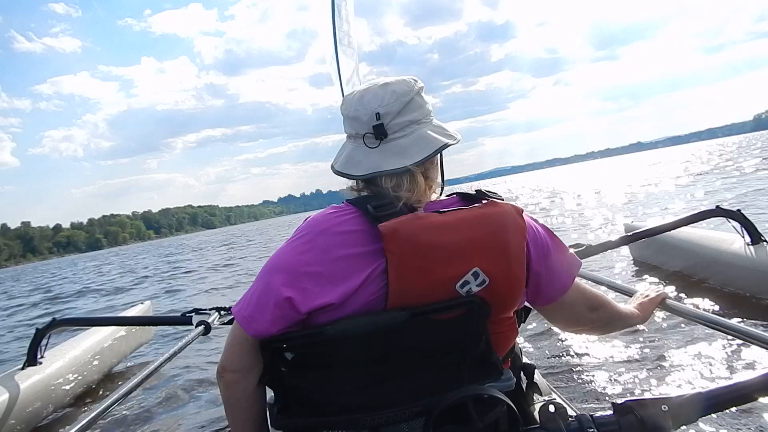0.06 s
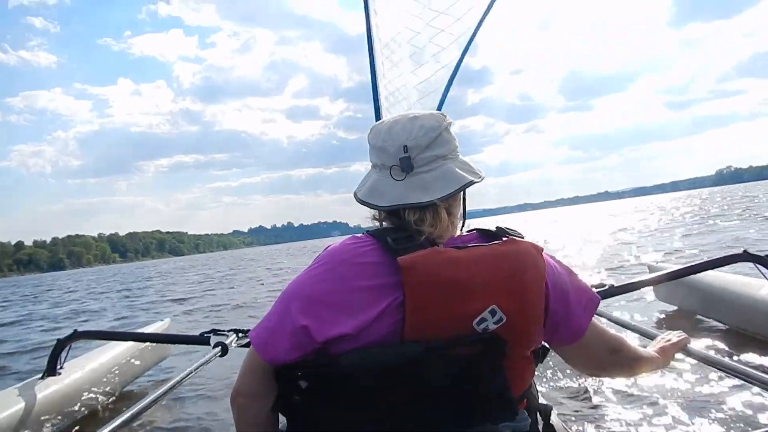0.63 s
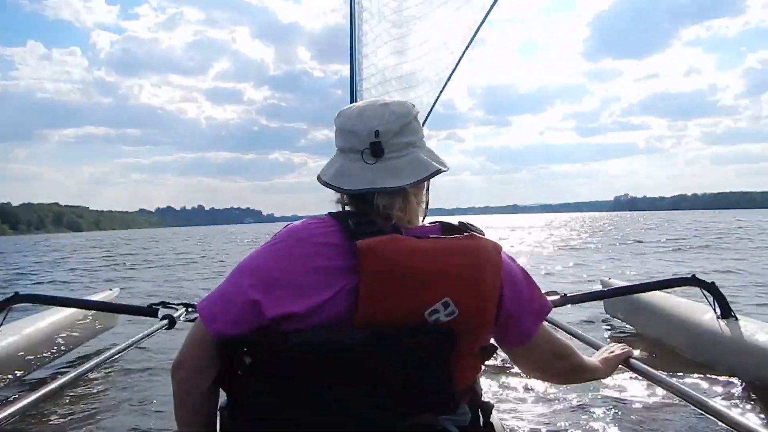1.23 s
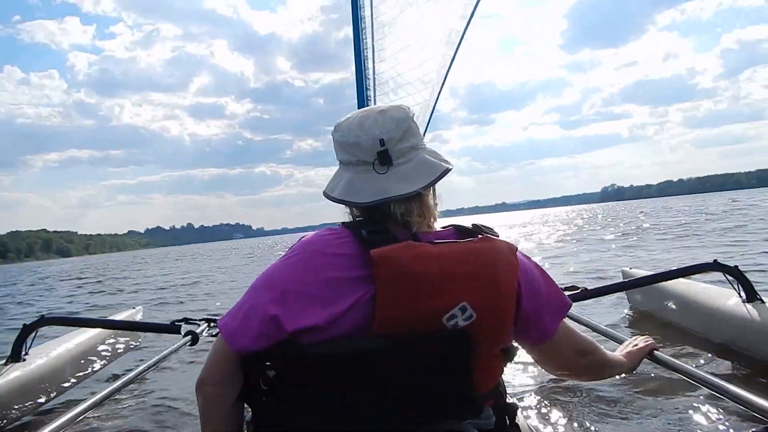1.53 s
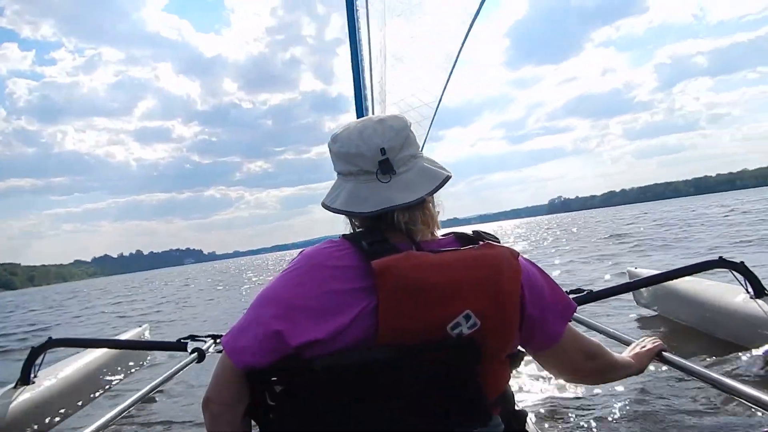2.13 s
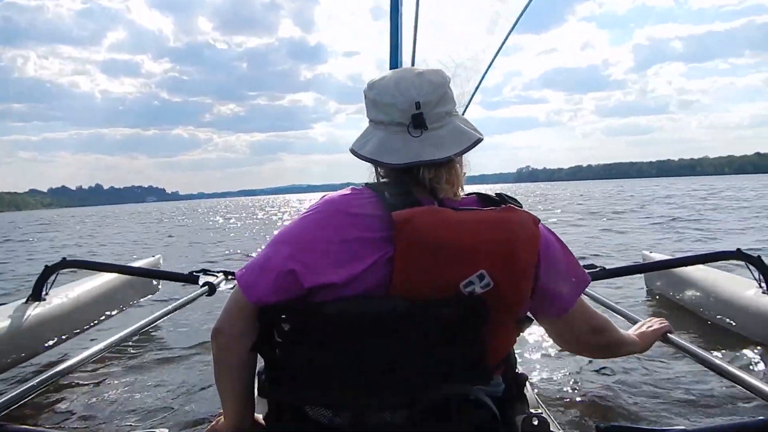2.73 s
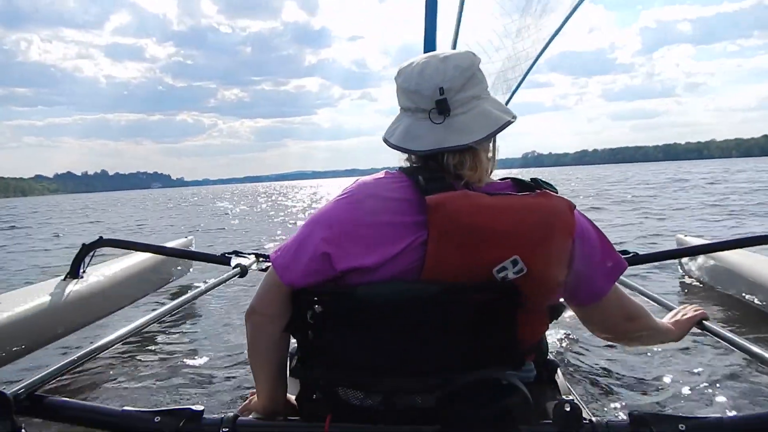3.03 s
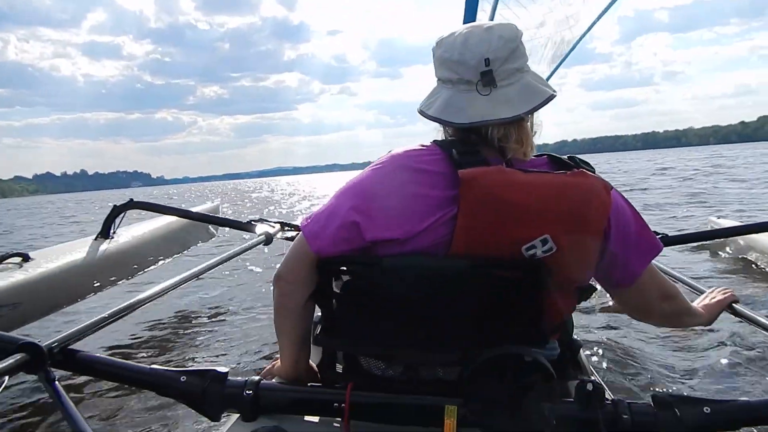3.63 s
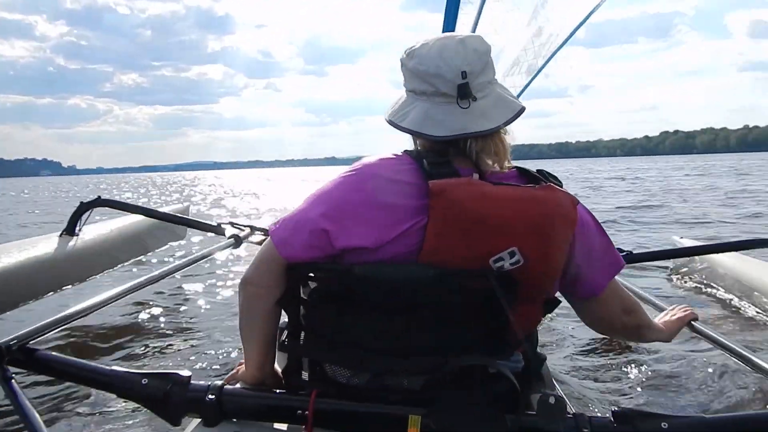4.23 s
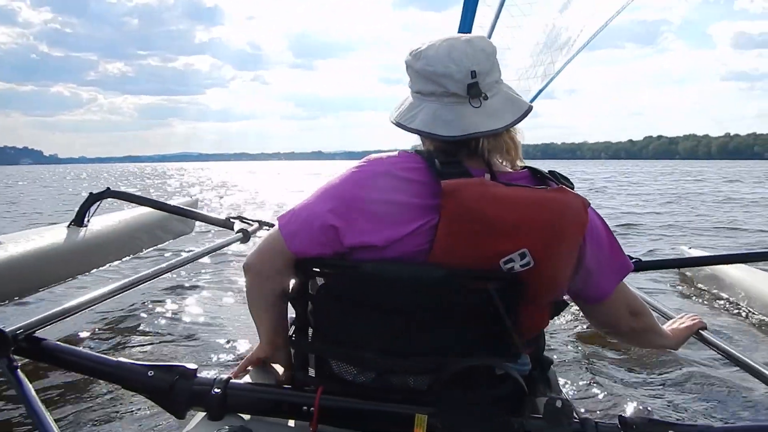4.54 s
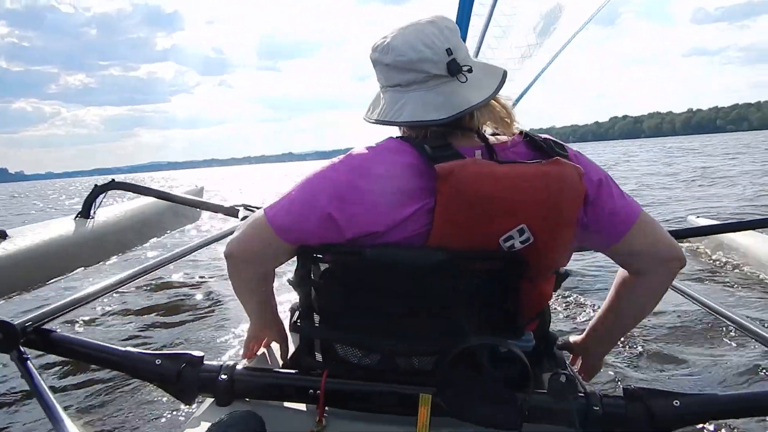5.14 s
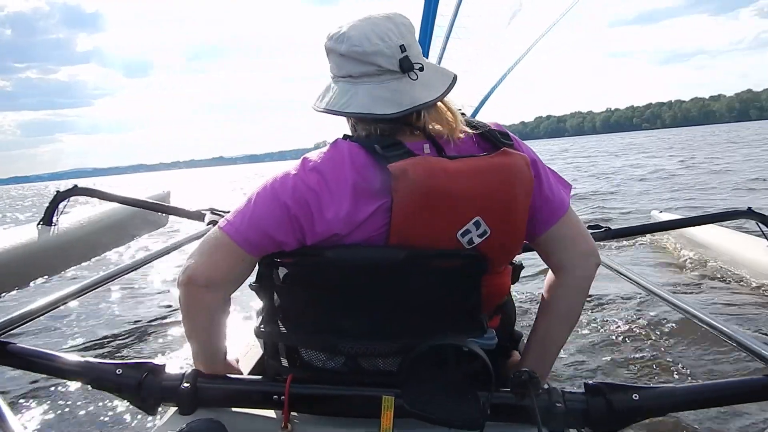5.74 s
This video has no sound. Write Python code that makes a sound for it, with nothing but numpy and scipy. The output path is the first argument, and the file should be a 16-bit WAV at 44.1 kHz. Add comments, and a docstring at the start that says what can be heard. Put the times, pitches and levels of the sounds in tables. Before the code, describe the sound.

Water washes and bubbles against a small sailing boat as hissing, buffeting gusts die down, with a few clicks and dull hull knocks.

```python
"""Gusts of wind rush, hiss and pop, then drop away to leave water lapping and bubbling.
A small outrigger sailing boat is running over a choppy river, with a camera fixed behind the seat.
The air rushes over the camera, and its swirls thump on the two microphone openings (ports).
Water washes along the hulls, fittings click and the hull gives a few dull knocks."""
import sys
import numpy as np
from scipy.fft import rfft, irfft, next_fast_len
from scipy.io import wavfile
from scipy.ndimage import map_coordinates

SR = 44100
rng = np.random.default_rng(int(sys.argv[2]) if len(sys.argv) > 2 else 0)


def inscribe(sig):
    """Save sig as 16-bit PCM at rate SR to the path in sys.argv[1].

    A 1-D sig is mono; a 2-D sig holds one channel per row.
    Samples are clipped to [-1, 1] before scaling.
    """
    pcm = np.round(np.clip(np.atleast_2d(sig).T, -1, 1) * 32767)
    wavfile.write(sys.argv[1], SR, pcm.astype(np.int16))


N = 259308
TIME = np.arange(N) / SR


def wind():
    """Air rushes over the camera; strong gusts tear into a sputtering hiss and throw fine spray."""
    # strength of the wind (time [s], relative level [dB])
    strength = [(0, -22), (.55, -18.5), (.87, -19), (.93, -28.5), (1.06, -18.5), (1.3, -21.5),
                (1.53, -30.5), (1.78, -32.5), (1.9, -59), (2.12, -36), (2.26, -37.5), (2.42, -26.5),
                (2.57, -40), (2.92, -27), (3.28, -34), (3.4, -39), (3.6, -37), (3.8, -60)]
    # gusts on top of it (time [s], relative peak [dB], rise time [s], hiss share [dB])
    gusts = [(.29, -20.5, 0.021, -10.5), (.42, -26.5, 0.026, -3.5), (0.607, -14.5, 0.0073, -8.5),
             (.68, -28, 0.0058, -4), (0.828, -17.5, 0.017, -16), (1.06, -23, 0.02, -9.5),
             (1.17, -23.5, 0.028, -4), (1.329, -19.5, 0.0067, -9), (1.425, -21.5, 0.013, -17.5),
             (2.089, -31, 0.0027, -12), (2.373, -18.5, 0.021, -21), (2.662, -22.5, 0.012, -19),
             (2.85, -28.5, 0.029, -22), (3.046, -38.5, 0.017, 5.5), (3.13, -31.5, .02, -8),
             (3.256, -20, 0.032, -10), (3.311, -17.5, 0.007, -5), (3.498, -25, 0.017, -8.5),
             (3.623, -38, 0.0083, -6)]
    # tone of the rush, its dull part, the hiss and the finest spray (frequency [Hz], level [dB])
    rush_tone = [(60, -21), (200, -7.5), (500, -6), (750, -1), (1150, 1), (1480, -1.5), (1750, 1.5),
                 (2300, -6), (2800, -13), (4000, -22), (7000, -54), (16000, -46)]
    murmur_tone = [(150, -9.5), (300, -3.5), (500, -3), (750, 1.5), (1100, -7.5), (1800, -16.5),
                   (4000, -77)]
    hiss_tone = [(800, -6), (2000, 6), (3000, 4), (3800, 7), (5300, 6.5), (6400, 1), (7300, -8),
                 (16000, -12.5)]
    mist_tone = [(4000, -25), (7500, -11), (10000, 1), (16000, -4)]
    strong_wind_db, strong_hiss_db = -19, -33.5
    wind_db = over_time(strength)
    hiss_db = strong_hiss_db + 1.22 * (wind_db - strong_wind_db)
    lull_db = np.interp(TIME, [3.6, 4.04], [0, -25])  # the wind drops away
    swirl = wobble(70)
    rush = amp(wind_db + lull_db + 0.89 * swirl - 1.32)
    rush = rush * coloured(noise() * amp(1.66 * wobble(500)), rush_tone)
    # the dull part changes less than the rush, so weak wind sounds darker
    murmur = amp(0.36 * wind_db + lull_db - 20) * coloured(noise(), murmur_tone)
    sputter = amp(2.4 * swirl + 1.84 * wobble(300))
    droplets = bubbles(per_second=1200, hz=4575, spread=0.312, cycles=11, scatter_db=6.5)
    fizz = amp(5) * coloured(noise() * sputter, hiss_tone) + amp(-5.5) * droplets
    gust_gain = sum(amp(db) * swell(s, rise) for s, db, rise, _ in gusts)
    gust_spray = sum(amp(db + share_db) * swell(s, rise) for s, db, rise, share_db in gusts)
    spray_gain = np.hypot(amp(hiss_db + lull_db), gust_spray)
    flung_drops = bubbles(per_second=900, hz=5520, spread=0.15, cycles=19, scatter_db=4)
    spurts = amp(2 * wobble(28) - 2)
    hiss = spray_gain * spurts * fizz + amp(-9) * gust_spray * flung_drops
    mist_gain = amp(-50.5) * (spray_gain / amp(strong_hiss_db)) ** 0.89
    mist = mist_gain * coloured(noise() * sputter, mist_tone)
    gust_rush = gust_gain * coloured(noise(), rush_tone)
    return ports(rush + murmur + hiss + mist + gust_rush, wider_db=-2)


def buffeting():
    """Swirls of air push on each port in lumps, making a low rumble and a flutter."""
    # strength of the swirling (time [s], relative level [dB])
    strength = [(0, -32.5), (.6, -31), (.76, -24.5), (1.18, -31.5), (1.6, -33), (2.25, -37), (2.5, -32.5),
                (3.1, -34), (3.45, -37.5), (3.77, -34), (3.95, -41), (4.33, -33), (4.45, -39.5),
                (4.68, -32), (4.9, -34.5), (5.25, -33), (5.88, -31.5)]
    # tone of the rumble and of the flutter (frequency [Hz], level [dB])
    rumble_tone = [(10, -7.5), (25, 2), (45, 1), (110, -0.5), (160, -9.5), (300, -25), (700, -60),
                   (2000, -94)]
    flutter_tone = [(60, -16), (130, 3), (280, -1.5), (400, -7.5), (600, -19.5), (1500, -27), (5000, -64)]
    lumps = amp(2.7 * np.array([wobble(25), wobble(23)]))
    rumble = amp(3) * stereo(coloured(noise() * lumps, rumble_tone), side_db=-2)
    flutter = amp(-0.5) * stereo(coloured(noise() * lumps, flutter_tone), side_db=-12.5)
    return amp(over_time(strength)) * (rumble + flutter) * amp([[0.4], [-0.4]][::-1])


def pops():
    """A strong swirl swings the air pressure at one port for a cycle or two; the other feels less."""
    # single swirls (time [s], level [dB], pitch [Hz], left minus right [dB])
    swirls = [(0.215, -8, 147, 8), (0.271, -4, 240, 15), (0.291, -4.5, 104, -6), (0.312, -8, 177, -9),
              (0.486, -12, 100, -3), (.667, -8, 236, -10), (0.715, -10.5, 170, -4), (0.752, -10.5, 196, 4),
              (.868, -9, 180, 17), (0.902, -3, 156, -8), (1.001, -10, 140, -1), (1.045, -9.5, 178, -19),
              (1.282, -9.5, 218, -4), (1.567, -12.5, 132, -19), (1.834, -14.5, 52, 1),
              (1.948, -15.5, 139, -3.5), (2.089, -17, 150, -16), (2.496, -13, 180, 15),
              (2.715, -15.5, 136, -18), (3.072, -18, 146, 3), (3.742, -13, 105, 1),
              (4.277, -17.5, 140, -2.5), (4.324, -16.5, 130, -4), (4.689, -14.5, 158, -12),
              (5.038, -8.5, 144, -6), (5.192, -14.5, 114, -12), (5.375, -16, 136, 21),
              (5.832, -1.5, 196, -17)]
    push_cycles = 0.51  # how long a pop pushes, in cycles of its own pitch
    out, t = np.zeros((2, N)), np.arange(-SR // 20, SR // 20) / SR
    for s, db, hz, lean_db in swirls:
        phase = 2 * np.pi * hz * t + rng.uniform(0, 2 * np.pi) + [[0], [1.4]]
        push = 1 / np.cosh(np.clip(t * hz / push_cycles, -20, 20))
        # the swing steepens at its height, which adds overtones
        swing = np.sin(phase) + push * (amp(-10) * np.sin(2 * phase) + amp(-15.5) * np.sin(3 * phase))
        port_gains = amp(db + np.minimum([[lean_db], [-lean_db]], 0))
        add(out, s + t[0], port_gains * swing * push)
    return out


def water():
    """Water washes along the hulls, full of bubbles and tiny splashes, with fine spray above it."""
    # strength of the flow (time [s], relative level [dB])
    flow = [(3.7, -40.5), (3.78, -51.5), (4.1, -44.5), (4.42, -47.5), (4.73, -39), (4.92, -42),
            (5.1, -39.5), (5.48, -44), (5.7, -39.5), (5.88, -40.5)]
    # single bubbles and drops (time [s], relative level [dB], pitch [Hz], life [s], pitch rise [share])
    drops = [(3.996, -34.5, 1464, 0.045, 0.23), (4.0, -34, 2280, .015, 0.11), (4.159, -25, 356, 0.019, .05),
             (4.39, -35, 1285, 0.044, 0.26), (4.423, -29, 2540, 0.017, 0.05),
             (4.636, -22.5, 3740, 0.0059, .05), (5.124, -29, 5300, .013, 0.024),
             (5.737, -27.5, 2030, 0.015, .1)]
    # small waves slapping the hulls (time [s], relative level [dB])
    slaps = [(2.297, -16), (3.831, -35.5), (4.265, -29), (4.314, -27.5), (4.612, -23.5), (4.651, -25),
             (4.761, -24.5), (5.004, -24.5), (5.119, -25), (5.559, -21), (5.594, -28), (5.615, -26),
             (5.653, -21), (5.801, -25.5)]
    # tone of the wash and of the spray (frequency [Hz], level [dB])
    wash_tone = [(150, -10), (500, 1), (750, 6), (1200, 2), (2100, 1), (2800, -24), (5000, -25),
                 (16000, -56)]
    spray_tone = [(1000, -16), (2500, 4.5), (3800, 4.5), (5500, 5.5), (7000, -4), (16000, -9)]
    wash_db = over_time(flow)
    build_up_db = np.interp(TIME, [3.27, 4.3], [-8.5, 0])
    spray_db = -51 + 0.36 * (wash_db - wash_db.mean()) + build_up_db
    lapping = amp(1.16 * wobble(30) + 2.1 * wobble(200))
    gurgle = bubbles(per_second=260, hz=1315, spread=0.625, cycles=5.4, scatter_db=3.5)
    fizz = bubbles(per_second=480, hz=4910, spread=0.32, cycles=12.5, scatter_db=6.5)
    wash = amp(-1) * coloured(noise() * lapping, wash_tone) + amp(-3) * gurgle
    spray = amp(2.5) * coloured(noise() * lapping, spray_tone) + fizz
    out = amp(wash_db) * wash + amp(spray_db) * spray
    t = np.arange(SR // 10) / SR
    for s, db, hz, life, rise in drops:
        churn = 1 + 0.49 * wobble(430)[:len(t)]  # the churning surface breaks up each ring
        add(out[0], s, amp(db + 1.5) * bubble(t, hz, life, rise) * churn)
    for s, db in slaps:
        burst = noise(len(t)) * (1 - np.exp(-t / 0.00043)) * amp(-60 * t / 0.061)
        splash = coloured(burst, wash_tone) + amp(-11) * coloured(burst, spray_tone)
        add(out, s, amp(db - 19) * splash)
    return ports(out, wider_db=-0.5)


def fittings():
    """Each click is one sharp snap followed by a brief, duller rattle through the frame."""
    # clicks (time [s], relative level [dB], brightness [dB], stereo width [dB], rattle [dB])
    clicks = [(1.782, -9, -5.5, -5, -4), (2.6284, -14, 2, 6, -13), (4.2253, -19.5, -7, -3, 0),
              (4.291, -24, -4.5, -2, 2), (4.4913, -16.5, -8, -4, 5), (4.6054, -20, -3, -2, 8),
              (4.7463, -19.5, -1, -7, -6), (4.995, -18.5, -7.5, -6, -2)]
    # tone of the whole click and of its rattle (frequency [Hz], gain [dB])
    click_tone = [(200, -6), (700, 14), (2100, 13), (3600, -0.5), (5500, -3), (8000, -7.5), (16000, -1.5)]
    rattle_tone = [(2000, 2), (6000, 8.5), (9000, -8), (16000, -13)]
    out, t = np.zeros((2, N)), np.arange(SR // 20) / SR
    lead = len(t) // 8  # silent samples that give the filter room before the snap
    fade = (1 - np.exp(-t / 0.00034)) * (amp(-60 * t / 0.011) + 0.085 * amp(-60 * t / 0.1))
    treble_share = [(2000, 0.03), (4500, 1.0)]  # (frequency [Hz], part of the brightness [share])
    for s, db, bright_db, wider_db, rattle_db in clicks:
        rattle = filtered(noise(len(t)) * fade, lambda hz: amp(along(rattle_tone, hz)))
        hit = amp(rattle_db - 5) * rattle
        hit[:, 0] += [1.4, 0.8]  # the snap
        tone = lambda hz: amp(along(click_tone, hz) + (bright_db + 9) * along(treble_share, hz))
        click = unit(filtered(np.pad(hit, ((0, 0), (lead, 0))), tone))
        add(out, s - lead / SR, amp(db - 18) * ports(click, wider_db))
    return out


def hull():
    """Soft blows swell and die within a few cycles of the hollow hull's note."""
    # dull knocks (time [s], relative level [dB], pitch [Hz])
    knocks = [(3.185, -16.5, 233), (3.312, -11, 278), (4.656, -23, 277), (4.747, -16.5, 190),
              (4.997, -23, 270)]
    out, t = np.zeros(N), np.arange(SR // 8) / SR
    age = t / 0.0058  # reaches 1 at the loudest moment
    for s, db, hz in knocks:
        ring = np.sin(2 * np.pi * hz * t) + amp(-5) * np.sin(2 * np.pi * 1.47 * hz * t)
        add(out, s, amp(db - 1.5) * ring * (age * np.exp(1 - age)) ** 2)
    return out


def bubble(t, hz, life, rise):
    """A fading ring whose pitch climbs as the bubble nears the surface."""
    age = t / life
    ring = np.sin(2 * np.pi * hz * t * (1 + rise * age / 2))
    return ring * (1 - np.exp(-10 * age)) * np.exp(-np.pi * age)


def bubbles(per_second, hz, spread, cycles, scatter_db):
    """A swarm of bubbles of random pitch, size and place, as a shared part and a side part."""
    when, pitch, size, place, length = rng.random((int(per_second * N / SR), 5)).T[..., None]
    ring_hz = hz * np.exp(spread * (2 * pitch - 1))
    t = np.arange(640) / SR
    loudness = amp(-scatter_db * np.log(1 - 0.98 * size))
    rings = loudness * bubble(t, ring_hz, life=cycles * (0.5 + length) / ring_hz, rise=0.032)
    samples = ((when * N).astype(int) + np.arange(len(t))).ravel()
    return np.array([unit(np.bincount(samples, (rings * pan).ravel(), N)[:N]) for pan in (1, place - .5)])


def swell(s, rise):
    """A gust climbs to its peak at time s and falls a little more slowly."""
    age = (TIME - s) / rise
    slower_fall, roundness = 1.14, 1.37  # roundness 1 gives a pointed peak, 2 a rounded one
    return np.exp(-0.5 * np.maximum(-age, age / slower_fall) ** roundness)


def ports(pair, wider_db):
    """The two ports sit close together, so they hear the same bass but different treble."""
    # how much the ports differ (frequency [Hz], side part minus shared part [dB])
    spread = [(300, -15.5), (1100, -16.5), (2000, -11.5), (3000, -3.5), (3900, -1.5), (4600, -5),
              (6000, -2), (7000, -1)]
    # which port hears more, mostly the right (frequency [Hz], left minus right [dB])
    lean = [(1000, -1.3), (1900, -1.5), (2800, -4.5), (4000, 0.5), (6000, -2), (8000, -2)]
    side = filtered(pair[1], lambda hz: amp(along(spread, hz) + wider_db))
    left_right = stereo([pair[0], side], side_db=0)
    return filtered(left_right, lambda hz: amp(along(lean, hz) * np.array([[0.5], [-0.5]])))


def stereo(pair, side_db):
    """Left and right: a shared part plus and minus a side part."""
    shared, side = pair[0], amp(side_db) * pair[1]
    return np.array([shared + side, shared - side])


def amp(db):
    """Turn decibels into a gain."""
    return 10 ** (np.asarray(db) / 20)


def unit(x):
    """Scale to an average power of 1."""
    return x / np.sqrt(np.mean(x ** 2) + 1e-20)


def along(points, hz):
    """Read between (frequency, value) points, with octaves evenly spaced."""
    point_hz, values = np.transpose(points)
    return np.interp(np.log(hz + 1), np.log(point_hz + 1), values)


def over_time(points):
    """Join (time, value) points into one value per sample."""
    return np.interp(TIME, *np.transpose(points))


def wobble(rate):
    """A smooth curve through `rate` random values a second."""
    return map_coordinates(rng.standard_normal(int(N * rate / SR) + 4), [TIME * rate])


def noise(length=N):
    """Two unrelated white noises."""
    return rng.standard_normal((2, length))


def filtered(x, response):
    """Multiply each frequency in x by response(frequency)."""
    length = x.shape[-1]
    padded = next_fast_len(length + 8192)
    return irfft(rfft(x, padded) * response(np.fft.rfftfreq(padded, 1 / SR)), padded)[..., :length]


def coloured(x, tone):
    """Shape x with a tone table, at an average power of 1."""
    return unit(filtered(x, lambda hz: amp(along(tone, hz))))


def add(track, s, sound):
    """Mix a sound into a track from time s."""
    start = max(round(s * SR), 0)
    part = track[..., start:start + sound.shape[-1]]
    part += sound[..., :part.shape[-1]]


def scene():
    """Wind, water and boat around the camera."""
    return wind() + buffeting() + pops() + water() + fittings() + hull()


def record(dry):
    """The camera dulls the treble, cuts three narrow dips, adds faint hiss and drops the very top."""
    # tone of the microphone (frequency [Hz], gain [dB])
    mic_tone = [(3950, -0.5), (4250, -7.5), (4700, -3.5), (5400, -3), (6150, -4), (6700, -7.5),
                (7500, -9.5), (9000, -15.5), (15500, -28)]
    # the camera's narrow dips (frequency [Hz], width [Hz])
    notches = [(2500, 75), (3195, 210), (5000, 105)]
    top_hz = 15830

    def response(hz):
        dips = [(at**2 - hz**2) / (at**2 - hz**2 + 1j * hz * width) for at, width in notches]
        return amp(along(mic_tone, hz)) * np.prod(dips, axis=0)

    return filtered(filtered(dry, response) + amp(-63.5) * noise(), lambda hz: hz < top_hz)


dry = scene()
out = record(dry)
inscribe(out)
```